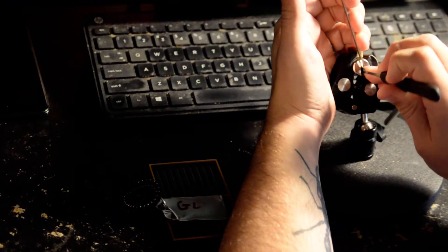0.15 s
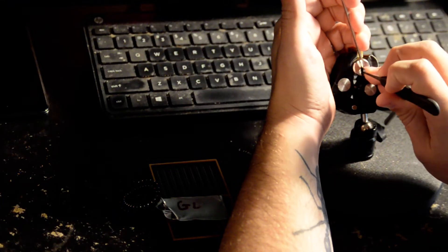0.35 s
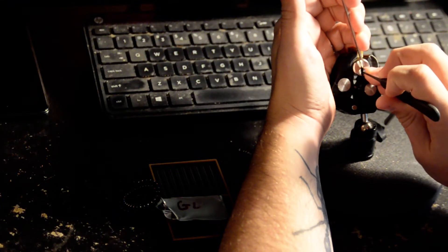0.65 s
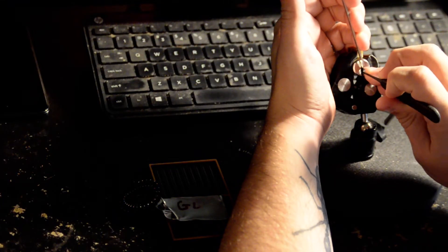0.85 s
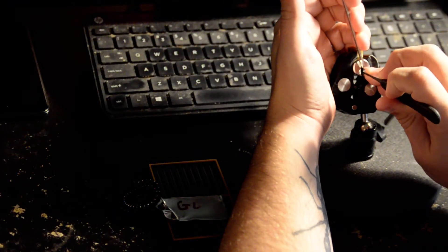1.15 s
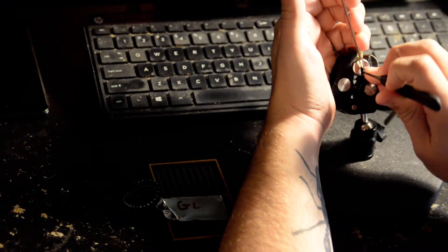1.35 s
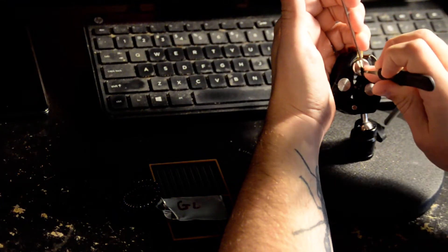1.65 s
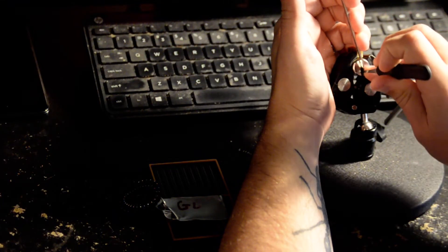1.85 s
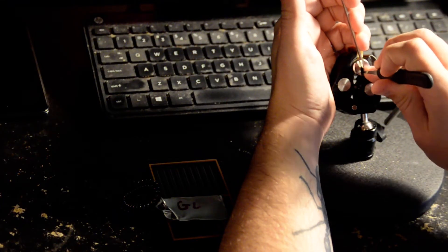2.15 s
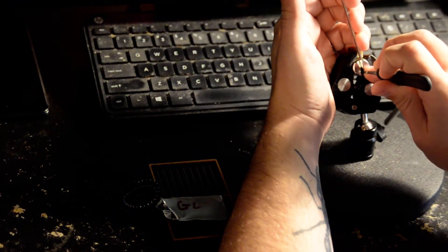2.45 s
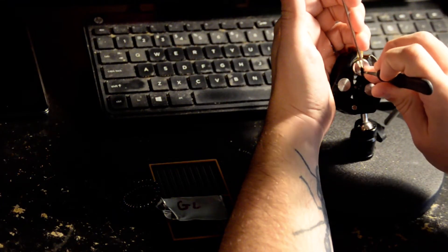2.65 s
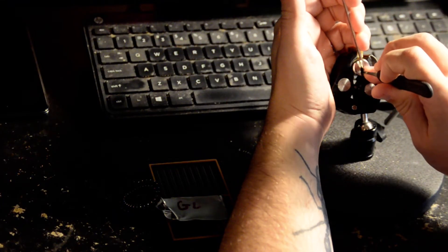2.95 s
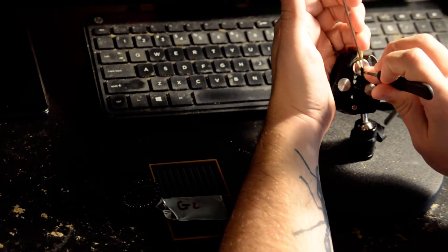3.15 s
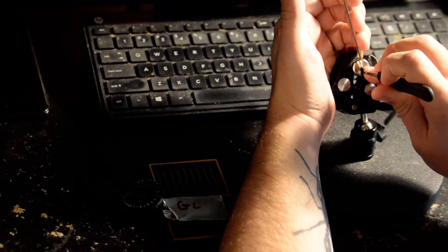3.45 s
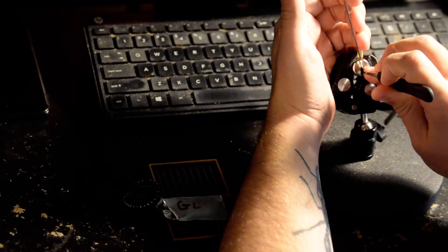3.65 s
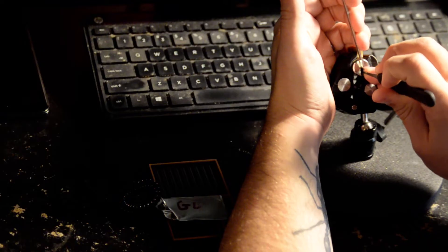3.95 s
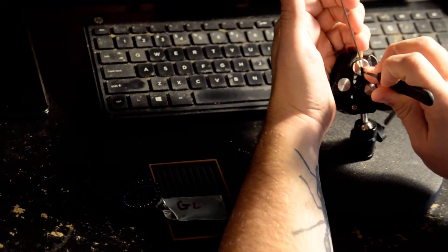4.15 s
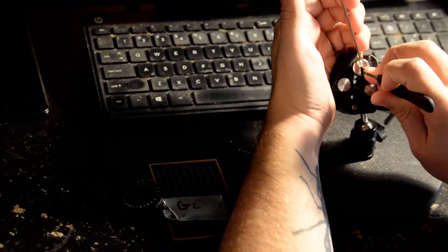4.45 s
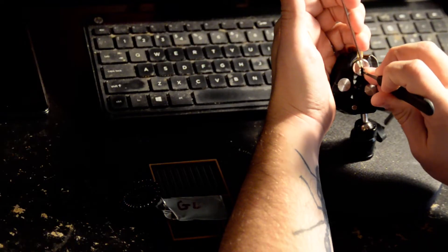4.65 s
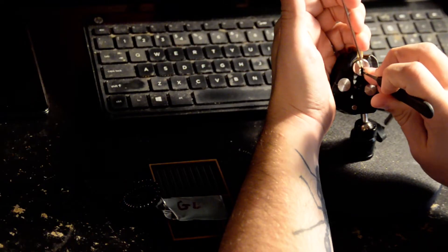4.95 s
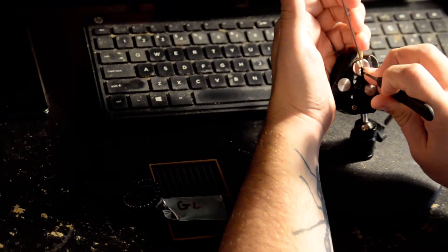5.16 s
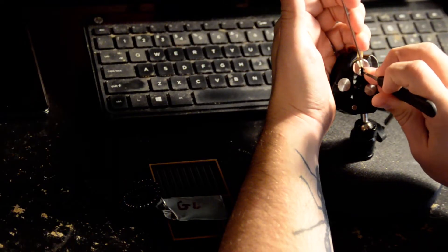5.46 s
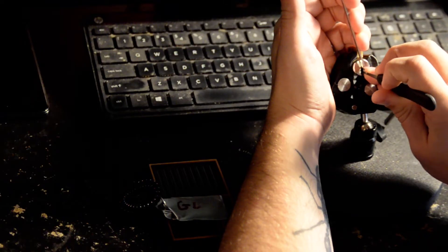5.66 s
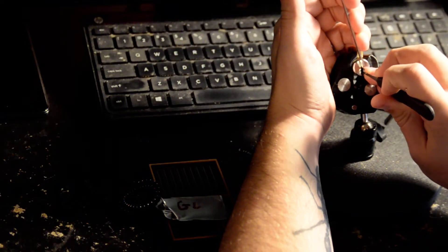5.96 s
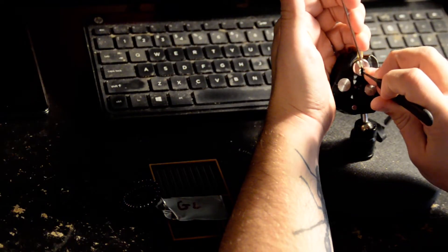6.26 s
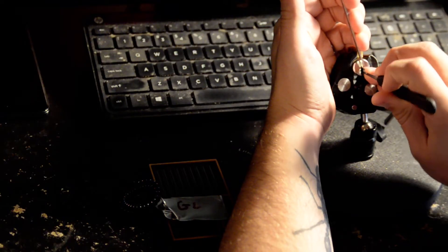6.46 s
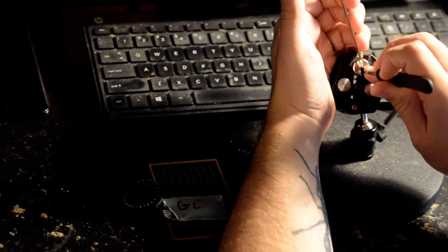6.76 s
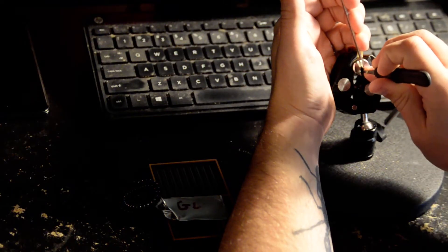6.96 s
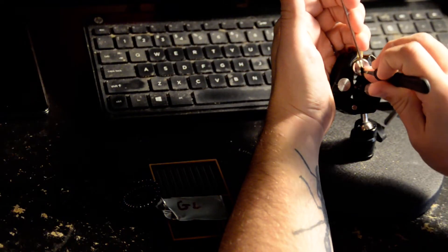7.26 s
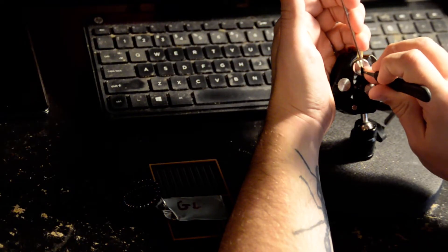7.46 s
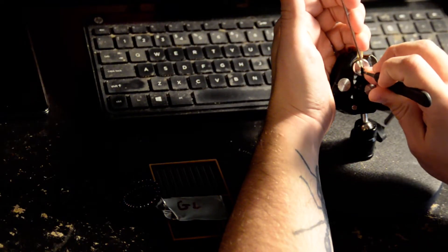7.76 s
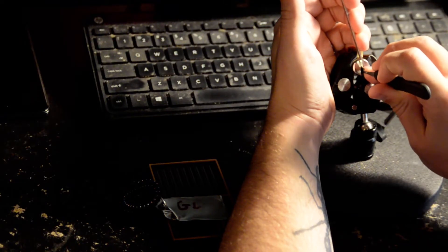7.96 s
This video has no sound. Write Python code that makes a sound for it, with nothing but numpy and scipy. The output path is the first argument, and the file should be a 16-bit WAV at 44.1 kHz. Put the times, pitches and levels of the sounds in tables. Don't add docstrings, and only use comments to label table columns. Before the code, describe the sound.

Indoors, close to one microphone, a raspy low mains buzz runs throughout, pulsing gently about twice a second, with wavering fan tones, soft hiss, fine sizzle and a distant low rumble that swells around 3 s and again at the end. A padlock sits in a small desk vice while a pick works its pins. A light tick at 1.8 s precedes the first crisp metal snap at 2.0. A low faint tick comes at 2.5, another at 3.25, then a brighter second snap at 3.35. At 3.85 a tiny click runs straight into the loudest snap, a hard clack with a solid desk knock. A faint tick at 4.65 leads to the last snap at 5.0. Barely audible ticks follow at 6.6 and 7.7. Each snap has a short pin rattle, a quickly damped metallic ring and a brief small-room tail; the buzz continues to about 8 s.

```python
import sys
import numpy as np
from scipy import signal
from scipy.fft import rfft, irfft
from scipy.io import wavfile

SR = 44100
rng = np.random.default_rng(int(sys.argv[2]) if len(sys.argv) > 2 else 0)


def digitize_waveform(pressure):
    field = np.atleast_2d(pressure).T
    bounded = np.clip(field, -1, 1)
    quanta = np.round(bounded * 32767).astype(np.int16)
    wavfile.write(sys.argv[1], SR, quanta)


def boost(x):
    u = np.asarray(x, float) / 20
    return 10 ** u


N = 356857

# start in seconds, then levels in dB of the ring, crack, rattle and desk knock.
SNAPS = [
    (2.0422, 3, -23.5, -37, -36.5),
    (3.3458, 1, -22.5, -33, -53),
    (3.8492, 1, -12, -26, -18),
    (5.0269, 3, -24.5, -40, -41),
    (3.8381, -4, -33, -43, -44),
]
SNAP_PINS = [0, 1, 2, 3, 3]
# frequency in Hz, level in dB per Hz.
CRACKS = [
    [(470, -35), (800, 1), (2630, 0), (3690, -6), (5580, -0.5), (6490, -11), (10400, -27), (16000, -46)],
    [(470, -48), (800, -20), (1830, -16), (5310, 0), (8550, -11), (10700, -8), (12600, -35), (16000, -24)],
    [(470, -36), (800, -14), (2660, -9), (3880, 1.5), (6820, -8), (10700, -26), (12000, -28), (16000, -30)],
    [(470, -37), (800, -3), (1950, -1), (3600, -4.5), (5720, 1.5), (7930, -6), (13400, -25), (16000, -31)],
]
# frequency in Hz, level in dB per Hz.
RATTLES = [
    [(350, -44), (700, -16), (1040, -4), (1700, -12), (2560, -20), (5210, -10), (7440, -37), (14000, -47)],
    [(350, -50), (977, -3), (1310, -23), (2700, -11), (4160, -14), (5280, -1), (7150, -17), (14000, -35)],
    [(350, -53), (1100, -12), (1550, -4), (2590, -22), (3700, -11), (6430, -15), (8260, -26), (14000, -45)],
    [(350, -51), (1000, -3), (1700, -8), (2450, -8), (3650, -26), (5070, -8), (6500, -13), (14000, -41)],
]
# frequency in Hz, level in dB per Hz.
SPRINGS = [(600, -14), (1000, -1), (2800, -12), (3400, 2), (4600, 9), (5400, -12), (7000, -17),
           (12000, -33)]
CRACK_S = 0.0026
RATTLE_T60, SPRING_T60, SPRING_DB = 0.08, 0.35, -11.5

# frequency in Hz, seconds to fall 60 dB, then level
# in dB when struck at pin 1, 2, 3 and 4.
LOCK_MODES = [(184, 0.049, -44, -47, -30, -48), (368, 0.21, -48, -57, -33, -57), (446, 0.071, -46, -58, -22, -51),
              (765, 0.066, -41, -32.5, -48, -35), (949, 0.12, -40, -34, -40, -36),
              (1010, 0.12, -28.5, -31.5, -32, -27), (1095, 0.066, -29, -40, -39.5, -28.5),
              (1444, 0.06, -31, -59, -17, -30), (1670, 0.1, -41, -44, -35, -40),
              (1824, 0.093, -37, -39, -41, -41), (2347, 0.08, -40, -59, -26.5, -32.5),
              (2690, 0.048, -57, -54, -43, -38),
              (3222, 0.095, -26, -36, -16, -25), (3245, 0.16, -38, -40, -24, -39),
        (3610, 0.11, -55, -55, -25, -42), (3870, 0.079, -53, -49, -24.5, -51),
        (4140, 0.12, -51, -59, -44, -61), (4630, 0.1, -43, -41, -30, -64), (4770, 0.15, -52, -43, -31, -52),
        (5080, 0.11, -47, -34, -40, -33), (5280, 0.076, -47, -34, -35, -35),
              (5880, 0.073, -71, -56, -50, -57), (6360, 0.1, -62, -40, -40, -46),
        (6250, 0.096, -58, -50, -27, -51), (7100, 0.057, -55, -53, -36, -42),
        (7560, 0.042, -70, -46, -29, -45), (8750, 0.068, -61, -61, -51, -57),
        (9600, 0.04, -69, -54, -60, -58), (10130, 0.043, -68, -49, -36, -52)]
DAMPING = 0.76
STRIKE_SPREAD = 0.15
RISE_CYCLES, RISE_POWER = 9, 0.6

# start in seconds, crack level in dB, frequency of its one ring in Hz,
# ring level in dB, desk knock level in dB.
TOUCHES = [
    (1.7999, -44.5, 5020, -44, -33),
    (2.5342, -50, 1010, -39, -41),
    (3.2527, -47, 5900, -50, -53),
    (4.6625, -54, 5500, -49, -60),
    (6.5920, -51, 6000, -50, -60),
    (7.683, -51, 8300, -60, -62),
]
# frequency in Hz, level in dB per Hz.
TOUCH_COLOUR = [(1500, -40), (3800, -10), (5200, 3), (8000, -8), (12000, -18), (16000, -30)]
TOUCH_T60, TOUCH_DULLING = 0.13, 0.6

# frequency in Hz, seconds to fall 60 dB, level in dB.
DESK = [(97, 0.26, -14), (186, 0.059, 0), (290, 0.036, -3.5), (376, 0.028, 2), (470, 0.033, -13),
        (814, 0.028, -7.5)]
KNOCK_S = 0.00718
BASS_CUT_HZ = 160

# frequency in Hz, seconds to fall 60 dB.
ROOM = [(200, 0.36), (1000, 0.15), (4000, 0.19), (8000, 0.16), (14000, 0.11)]
ROOM_DB = -10.5

# frequency in Hz, level in dB rms of each harmonic.
BUZZ_TONE = [(120, -75), (1700, -72), (2100, -77), (3300, -77), (3650, -78), (4000, -73.5), (4500, -78),
             (6400, -88.5)]
LOUD_ORDERS = [1, 3, 4, 5, 9, 12, 14, 17, 21, 22, 24, 27, 29, 30, 31, 37, 41, 44, 65, 72, 82, 84]
LOUD_DB = [-64.5, -60.5, -60, -56.5, -67.5, -64, -66.5, -60, -69, -67.5, -67.5, -69, -69.5, -64.5, -69,
           -65.5, -71.5, -69.5, -68.5, -69.5, -73, -69]
MUTED_ORDERS = [8, 25, 26, 28, 32, 34, 38, 46, 48, 49, 60, 62, 73, 74, 76, 79, 81, 83]
MUTED_DB = -86
MAINS_HZ = 60.005
BUZZ_TOP, BUZZ_SCATTER_DB = 107, 4
SLIP_DB, SLIP_FIRST_S, SLIP_EVERY_S = -61, -0.07, 0.551
SURGE_S, SURGE_WIDTH_S, SURGE_LAG_S = 2.95, 1.15, 0.18

# frequency in Hz, width in Hz, level in dB.
FANS = [(96.95, 2.6, -66.5), (149.4, 6.3, -65.5), (176, 3.4, -64), (221, 3.1, -71), (563.5, 16, -67.5),
        (29, 0.23, -75)]
# frequency in Hz, level in dB per Hz.
HISS = [(12, -43), (35, -22), (60, -7), (168, -2), (301, -3.5), (485, -9), (923, -6), (1050, -12.5),
        (1810, -12), (1960, -16), (2260, -14), (3630, -17.5), (4180, -9.5), (6910, -23), (16000, -26.5)]
# frequency in Hz, level in dB per Hz.
SIZZLE = [(2500, -36), (3700, -4.5), (4200, 3), (5200, -1), (6500, -13), (12000, -24), (16000, -31)]
HISS_DB, SIZZLE_DB = -52, -62
# time in seconds, level in dB.
RUMBLE = [(0.0, -50.5), (1.1, -53), (1.6, -58), (2.5, -51.5), (3.15, -45.5), (4.0, -53), (5.0, -54.5),
          (6.5, -52.5), (6.9, -56.5), (7.7, -48), (8.09, -44.5)]
# frequency in Hz, level in dB per Hz.
RUMBLE_TONE = [(60, -20), (110, -2.5), (160, 0), (300, -7), (450, -9), (800, -39)]

HIT_T = np.arange(12000) / SR


def evened(x):
    return x / np.sqrt(np.mean(x ** 2) + 1e-20)


def read(points, hz):
    f, value = np.transpose(points)
    return np.interp(np.log(hz + 1), np.log(f + 1), value)


def add(mix, s, sound):
    part = mix[round(s * SR):][:len(sound)]
    part += sound[:len(part)]


def noise(colour, size):
    hz = np.fft.rfftfreq(size, 1 / SR)
    spectrum = rfft(rng.standard_normal(size)) * boost(read(colour, hz))
    return evened(irfft(spectrum, size))


def ring(modes, rise_cycles, blur):
    hz, t60, db = np.transpose(modes)[:, :, None]
    steps = rng.standard_normal((len(hz), len(HIT_T)))
    wander = blur * np.sqrt(hz / SR) * np.cumsum(steps, 1)
    phase = 2 * np.pi * STRIKE_SPREAD * rng.random(hz.shape) + wander
    grow = 1 - np.exp(-(HIT_T * hz / rise_cycles) ** 2)
    fade = boost(db - 60 * HIT_T / t60)
    return (fade * grow * np.sin(2 * np.pi * hz * HIT_T + phase)).sum(0)


def onset():
    return np.minimum(HIT_T / 0.0005, 1)


def crack(pin):
    return np.exp(-(HIT_T / CRACK_S) ** 2) * noise(CRACKS[pin], len(HIT_T)) * onset()


def rattle(pin):
    loose = boost(-60 * HIT_T / RATTLE_T60) * noise(RATTLES[pin], len(HIT_T))
    springs = boost(SPRING_DB - 60 * HIT_T / SPRING_T60) * noise(SPRINGS, len(HIT_T))
    return (loose + springs) * np.minimum(HIT_T / 0.0017, 1)


def lock_ring(pin):
    modes = np.array(LOCK_MODES)[:, [0, 1, 2 + pin]] * [1, DAMPING, 1]
    rise_cycles = RISE_CYCLES * (modes[:, :1] / 3000) ** RISE_POWER
    return ring(modes, rise_cycles, 0.047)


def snaps():
    out = np.zeros(N)
    for pin, (s, ring_db, crack_db, rattle_db, knock_db) in zip(SNAP_PINS, SNAPS):
        add(out, s, boost(crack_db) * crack(pin))
        add(out, s, boost(rattle_db) * rattle(pin))
        add(out, s, boost(ring_db) * lock_ring(pin))
        add(out, s + KNOCK_S, boost(knock_db) * ring(DESK, 0.18, 0))
    return out


def touches():
    out = np.zeros(N)
    for s, tick_db, hz, ring_db, knock_db in TOUCHES:
        t60 = TOUCH_T60 * (1000 / hz) ** TOUCH_DULLING
        tick = noise(TOUCH_COLOUR, len(HIT_T)) * boost(tick_db - 60 * HIT_T / 0.029) * onset()
        add(out, s, tick + ring([(hz, t60, ring_db)], 2.5, 0.46))
        add(out, s + KNOCK_S, boost(knock_db) * ring(DESK, 0.37, 0))
    return out


def lock():
    bass_cut = signal.butter(2, BASS_CUT_HZ, "high", fs=SR, output="sos")
    return signal.sosfilt(bass_cut, snaps() + touches())


def room(x):
    taps = np.zeros(SR // 2)
    at = np.arange(160, SR // 2 - 20, 20)
    taps[at + rng.integers(0, 20, len(at))] = rng.choice([-1., 1.], len(at))
    hz, t, z = signal.stft(taps, SR, nperseg=256)
    fade = boost(-60 * t / read(ROOM, hz)[:, None])
    tail = signal.istft(z * fade, SR, nperseg=256)[1]
    return signal.fftconvolve(x, tail / np.linalg.norm(tail))[:N]


def buzz():
    t = np.arange(N) / SR
    phase, weaker = rng.random((BUZZ_TOP, 2)).T
    order = np.arange(BUZZ_TOP) + 1
    db = read(BUZZ_TONE, order * MAINS_HZ) + BUZZ_SCATTER_DB * (1 + np.log(weaker + 0.013))
    db[np.array(LOUD_ORDERS) - 1] = LOUD_DB
    db[np.array(MUTED_ORDERS) - 1] = MUTED_DB
    grid = np.linspace(0, 1, 4096)
    cycle = boost(db) @ np.cos(2 * np.pi * (order[:, None] * grid + phase[:, None]))
    lag = SURGE_LAG_S * np.exp(-((t - SURGE_S) / SURGE_WIDTH_S) ** 2)
    slipped = (t - lag - SLIP_FIRST_S) / SLIP_EVERY_S + 0.5
    fan = boost(SLIP_DB) * np.cos(2 * np.pi * (5 * MAINS_HZ * t + phase[4] - slipped))
    return np.sqrt(2) * (np.interp(t * MAINS_HZ % 1, grid, cycle) + fan)


def fans():
    hz = np.fft.rfftfreq(N, 1 / SR)
    out = np.zeros(N)
    for centre, width, db in FANS:
        band = rfft(rng.standard_normal(N)) / (1 + (2 * (hz - centre) / width) ** 2)
        out += boost(db) * evened(irfft(band, N))
    return out


def air():
    t = np.arange(N) / SR
    mains = 2 * np.pi * MAINS_HZ * t
    pulse = np.exp(1.6 * np.cos(mains) + 0.17 * np.cos(2 * mains))
    sizzle = boost(SIZZLE_DB) * evened(pulse) * noise(SIZZLE, N)
    swell_db = np.interp(t, *np.transpose(RUMBLE))
    rumble = boost(swell_db - 6.5) * noise(RUMBLE_TONE, N)
    return boost(HISS_DB) * noise(HISS, N) + sizzle + rumble


def scene():
    hits = lock()
    echo = boost(ROOM_DB) * room(hits)
    return np.tile(hits + echo + buzz() + fans() + air(), (2, 1))


def low_pass(x):
    return signal.sosfilt(signal.butter(12, 15800, fs=SR, output="sos"), x)


def record(dry):
    return low_pass(dry)


dry = scene()
out = record(dry)
digitize_waveform(out)
```